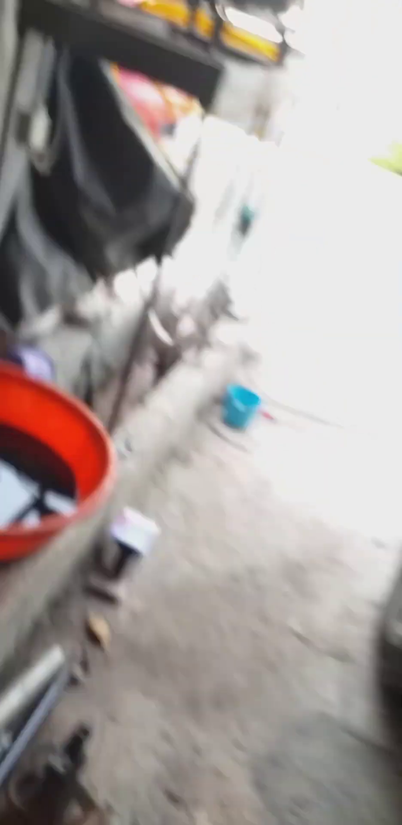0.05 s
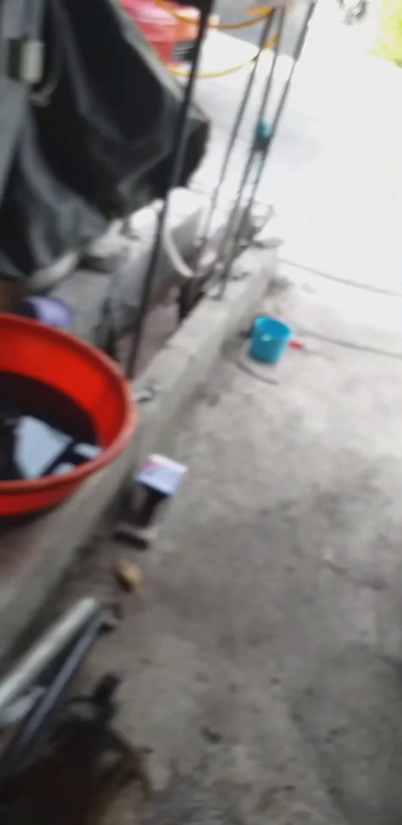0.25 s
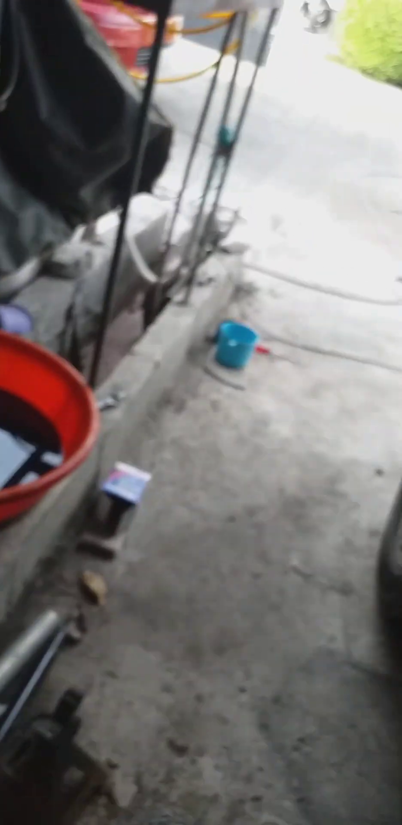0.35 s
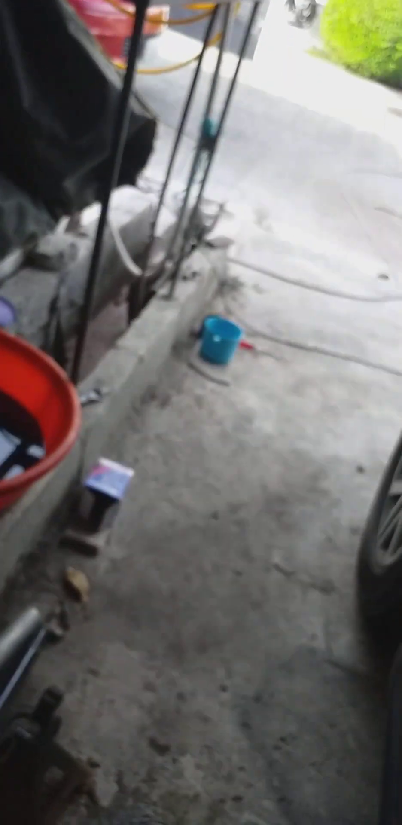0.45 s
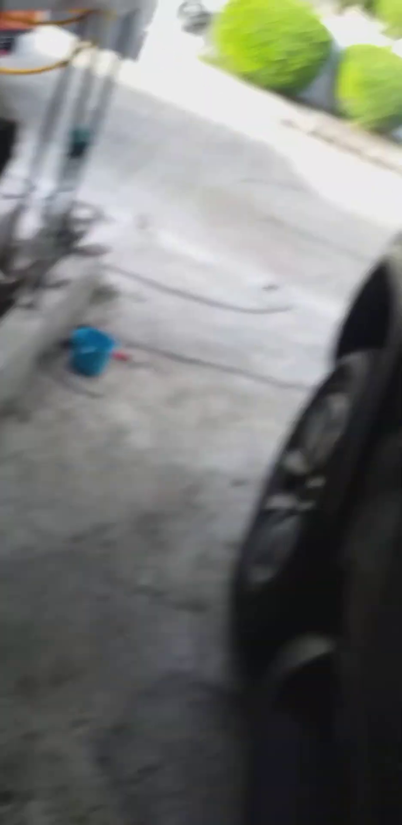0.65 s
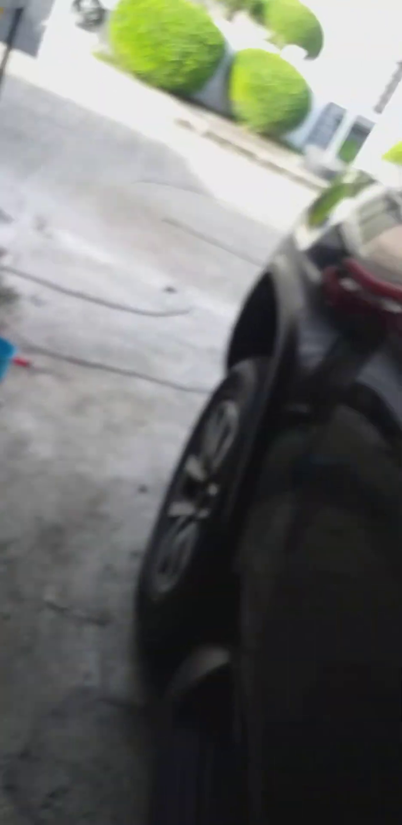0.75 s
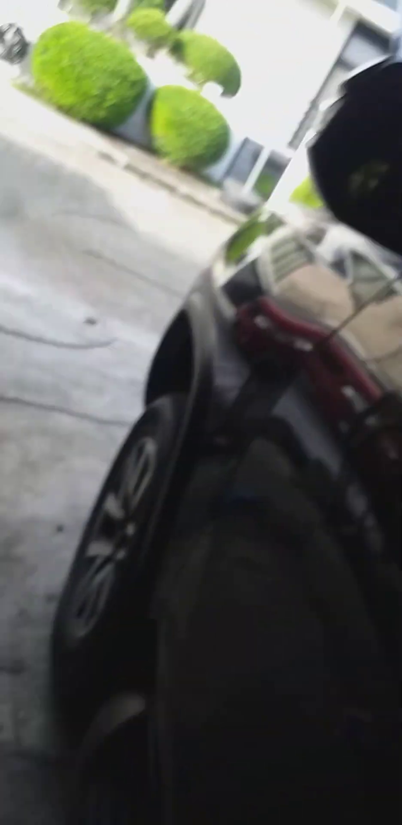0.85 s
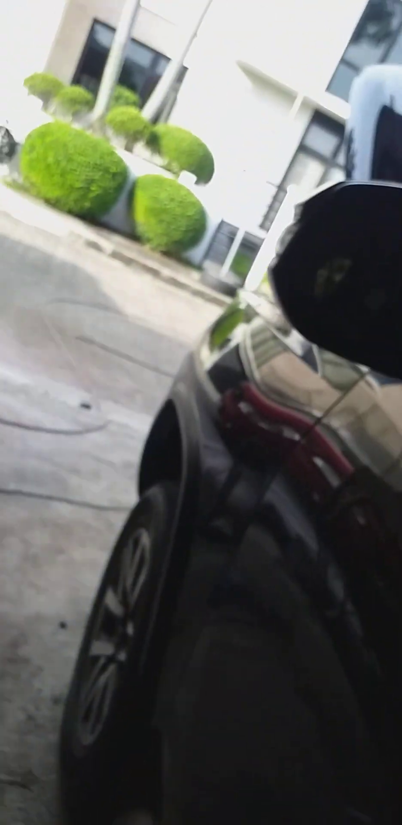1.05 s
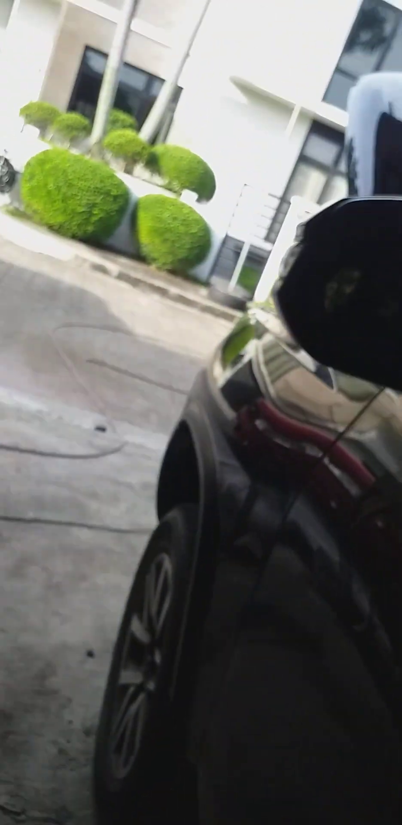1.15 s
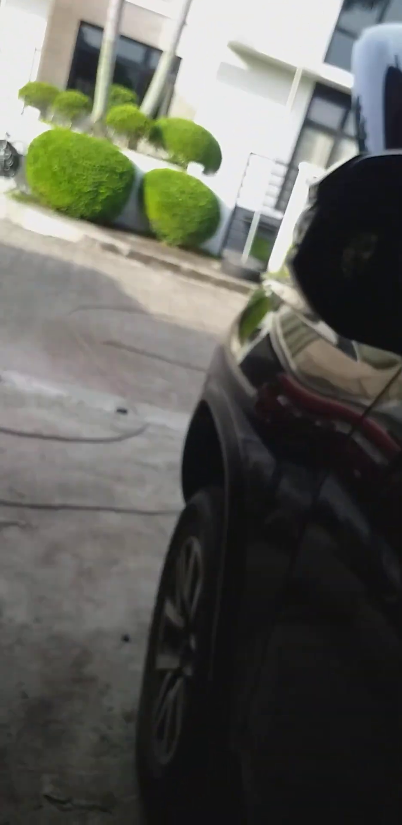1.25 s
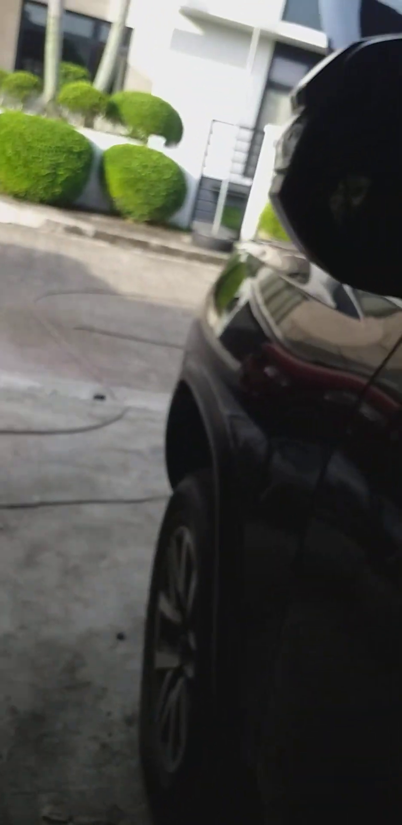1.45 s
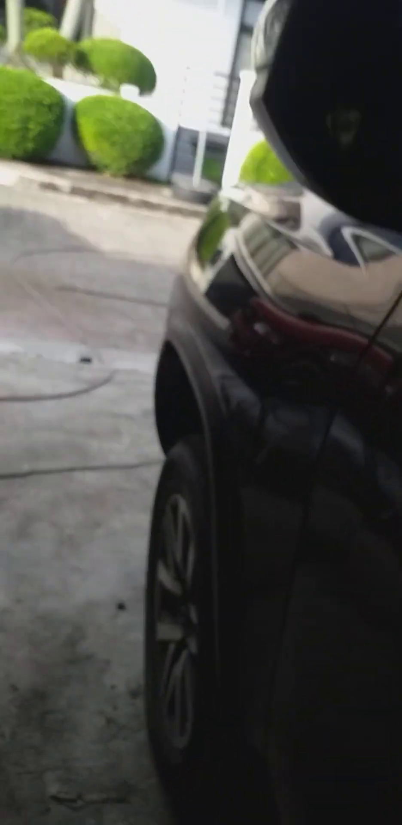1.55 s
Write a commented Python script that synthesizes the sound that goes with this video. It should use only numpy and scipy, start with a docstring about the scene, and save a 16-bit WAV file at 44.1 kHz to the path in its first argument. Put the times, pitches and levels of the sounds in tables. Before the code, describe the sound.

A car door is shut close by in a workshop yard, a hollow thud with a short rattle of latch and trim. A machine hisses and whines throughout as the microphone is carried alongside the car, bumping softly.

```python
"""A car door is shut close by in a workshop yard: the latch touches, the door thuds home, its panels shudder.
Each contact rings the hollow body and steel panels and rattles latch and trim; the yard answers weakly.
A machine runs throughout, a hissing drone with rough whines that drift, swell and fade as the microphone
is carried alongside the car. Under it lie a low hum and a few soft handling bumps."""
import sys
import numpy as np
from scipy import signal
from scipy.fft import rfft, irfft, next_fast_len
from scipy.io import wavfile
from scipy.ndimage import uniform_filter1d, map_coordinates

SR = 44100
rng = np.random.default_rng(int(sys.argv[2]) if len(sys.argv) > 2 else 0)


def generate_wav(sig):
    """Save sig (samples, or channels by samples) to the path in sys.argv[1] as 16-bit PCM at SR."""
    pcm = np.round(np.clip(np.atleast_2d(sig).T, -1, 1) * 32767).astype(np.int16)
    wavfile.write(sys.argv[1], SR, pcm)


N = 70560


def amp(db):
    """Decibels to gain."""
    return 10 ** (np.asarray(db) / 20)


def unit(x):
    """Scale to rms 1."""
    return x / np.sqrt(np.mean(x ** 2) + 1e-20)


def clock(start_s=0):
    """Seconds since start_s per sample, zero before it."""
    return np.maximum(np.arange(N) / SR - start_s, 0)


def curves(rows):
    """Per-sample curve for each column after the time."""
    time_s, *columns = np.transpose(rows)
    return [np.interp(clock(), time_s, column) for column in columns]


def wobble(rate_hz):
    """Smooth random curve, rate_hz knots a second."""
    knots = rng.standard_normal(int(N * rate_hz / SR) + 4)
    return map_coordinates(knots, [clock() * rate_hz])


def filtered(x, response):
    """Apply a frequency response, a function of Hz."""
    size = next_fast_len(N + SR // 2)
    return irfft(rfft(x, size) * response(np.fft.rfftfreq(size, 1 / SR)), size)[:N]


def noise(spectrum):
    """Noise of rms 1 shaped by (freq_hz, level_db) points."""
    freq_hz, level_db = np.transpose(spectrum)
    white = rng.standard_normal(N)
    return unit(filtered(white, lambda hz: amp(np.interp(np.log(hz + 1), np.log(freq_hz + 1), level_db))))


def narrow(centre_hz, width_hz):
    """Noise band of rms 1 around a steady or moving centre."""
    a, b = [filtered(rng.standard_normal(N), lambda hz: 1 / (1 + (hz / width_hz) ** 2 / 2) ** 2)
            for _ in range(2)]
    phase = 2 * np.pi * np.cumsum(centre_hz * np.ones(N)) / SR
    return unit(a * np.cos(phase) + b * np.sin(phase))


def fade(t, attack_s, t60_s):
    """Quick rise, exponential decay."""
    return (1 - np.exp(-t / attack_s)) * np.exp(-np.log(1000) * t / t60_s)


def patchy(x, depth_db):
    """Narrow bands swell and sink at random; output rms 1."""
    spectra = signal.stft(x, nperseg=1024)[2]
    field = uniform_filter1d(rng.standard_normal(spectra.shape), size=3, axis=0)
    field = uniform_filter1d(field, size=18, axis=1)
    return unit(signal.istft(spectra * amp(depth_db * unit(field)), nperseg=1024)[1][:N])


def machine_hum():
    """Low rumble with three unsteady tones."""
    spectrum = [(25, -35), (45, 7), (65, 0), (130, 6.5), (220, 2.5), (350, -2.5), (550, 1), (900, -17),
                (2000, -39)]  # rumble: freq_hz, relative_db
    envelope = [(0, -46.5), (.3, -41.5), (.65, -48.5), (.9, -56), (1.3, -56.5), (1.6, -52.5)]  # rumble: time_s, level_db
    tones = [(60, -69.5), (361, -62), (500, -68.5)]  # pitch_hz, level_db
    level_db, = curves(envelope)
    rumble = amp(level_db) * noise(spectrum)
    return rumble + sum(amp(db) * narrow(hz, width_hz=7.4) for hz, db in tones)


def machine_hiss():
    """Broad hiss with four rough, drifting resonances, one brief whistle and a steady sizzle."""
    spectrum = [(150, -33), (400, -12), (800, -10), (1200, -5), (1550, -6.5), (2100, -3.5), (2700, -4.5),
                (3400, -1.5), (4200, -5), (5000, -1), (5700, -4), (6400, -11.5), (7300, -19), (8100, -36),
                (9000, -43), (10500, -35), (13000, -36), (16000, -40)]  # hiss: freq_hz, relative_db
    envelope = [(0, -28), (.1, -29), (.22, -29), (.33, -31), (.45, -31.5), (.56, -34), (.7, -34), (.9, -36),
                (1.1, -36.5), (1.42, -35.5), (1.5, -33), (1.59, -31.5)]  # hiss: time_s, level_db
    # whine tracks: time_s, pitch_hz, level_db
    low = [(0, 990, -41), (0.108, 947, -38), (0.222, 1003, -49), (0.419, 1055, -38), (0.579, 1070, -48.5),
           (0.762, 1140, -48.5), (1.03, 1029, -53.5), (1.25, 1046, -53), (1.6, 973, -53)]
    mid = [(0, 1978, -38), (0.151, 1912, -41), (.4, 2115, -41), (0.599, 2168, -51), (0.719, 2206, -45.5),
           (.9, 2157, -42.5), (1.029, 2078, -37), (1.121, 2086, -48.5), (1.3, 2109, -42.5),
           (1.431, 2005, -53), (1.58, 1956, -40.5)]
    high = [(0, 3010, -32), (0.109, 2970, -37), (0.239, 2930, -43), (.33, 3260, -32.5), (0.401, 3260, -38),
            (0.501, 3290, -35.5), (0.572, 3280, -46), (.74, 3440, -43), (0.879, 3400, -45.5),
            (1.129, 3345, -44), (1.24, 3325, -38), (1.32, 3320, -49), (1.389, 3060, -45.5),
            (1.501, 2990, -42.5), (1.6, 3100, -47)]
    shrill = [(0, 5446, -41), (0.169, 5330, -37.5), (.3, 4980, -56), (.52, 5095, -46.5), (.7, 4956, -38.5),
              (0.782, 5186, -43.5), (0.879, 5072, -36.5), (.94, 5130, -43), (1.001, 5040, -39),
              (1.129, 5150, -39), (1.2, 5092, -42.5), (1.289, 5310, -42.5), (1.37, 5000, -39.5),
              (1.47, 4907, -51), (1.58, 5170, -34)]
    widths_hz = [25, 21.5, 42.4, 69]  # whine cores, low to shrill: width_hz
    level_db, = curves(envelope)
    out = amp(level_db) * patchy(noise(spectrum), depth_db=2)
    for track, width_hz in zip([low, mid, high, shrill], widths_hz):
        pitch_hz, whine_db = curves(track)
        core = narrow(pitch_hz, width_hz)
        skirt = amp(-10.5) * narrow(pitch_hz, width_hz=140)
        out += amp(whine_db) * unit(core + skirt)
    swell = np.exp(-((clock() - 0.892) / 0.13) ** 2)
    whistle = amp(-37) * swell * narrow(4715, width_hz=39)
    sizzle = amp(-44.5) * narrow(4790, width_hz=350)
    flutter_db = 0.15 * wobble(rate_hz=250)
    return (out + whistle + sizzle) * amp(flutter_db)


def handling():
    """Soft, dull bumps on the carried microphone."""
    bumps = [(.025, 105, -35), (0.099, 85, -32.5), (.43, 68, -36), (0.474, 110, -35), (.58, 150, -46.5)]  # start_s, pitch_hz, level_db
    rise_s = 0.0071
    out = np.zeros(N)
    for start_s, pitch_hz, level_db in bumps:
        age = clock(start_s) / rise_s
        out += amp(level_db) * age * np.exp(1 - age) * narrow(pitch_hz, width_hz=26)
    return out


def yard(x):
    """Weak, diffuse reflections from walls and roof."""
    tail = rng.standard_normal(N) * fade(clock(), attack_s=0.018, t60_s=0.53)
    return amp(-24) * signal.fftconvolve(x, tail / np.linalg.norm(tail))[:N]


def latch():
    """The steel catch rings briefly as it snaps in."""
    envelope = fade(clock(start_s=0.279), attack_s=0.0016, t60_s=0.048)
    return amp(-14) * narrow(4430, width_hz=280) * envelope


def ring(modes, t, attack_s):
    """Decaying modes of a struck part, normalised; levels and phases vary per blow."""
    modes_rms = np.linalg.norm([amp(db) for _, db, _ in modes]) / np.sqrt(2)
    out = np.zeros(N)
    for k, (pitch_hz, level_db, t60_s) in enumerate(modes):
        gain = (-1) ** k * amp(level_db + rng.normal())
        phase = 2 * np.pi * pitch_hz * t + 0.68 * rng.normal()
        out += gain * fade(t, attack_s, t60_s) * np.sin(phase)
    return out / modes_rms


def door():
    """Each contact booms in the hollow body, rings the steel panels and rattles latch and trim."""
    contacts = [(.235, -50, -12.5, -34.5), (0.2601, -10.5, -13.5, -12), (.269, -15.5, -20.5, -18),
                (.281, -17, -19.5, -21.5), (.292, -9, -12, -29.5), (.338, -14.5, -23.5, -52),
                (.372, -23.5, -38, -58), (0.41, -36, -33.5, -41)]  # start_s, boom_db, panel_db, clatter_db
    body_modes = [(51, -12.5, 0.39), (76, -6, 0.39), (94, -9.5, .14), (126.4, -6.5, 0.23),
                  (156.4, -3.5, 0.28), (204.7, 1.5, 0.166), (269.8, -2, 0.151)]  # pitch_hz, relative_db, t60_s
    panel_modes = [(321.5, -4.5, 0.15), (371, -2.5, 0.12), (392.8, -3.5, 0.28), (459, 4, 0.14),
                   (481, -9.5, 0.15), (522.5, 0.5, 0.14), (586, -13.5, 0.23), (870, -9, 0.099),
                   (981, -16, 0.13), (1128, -7, 0.13)]  # pitch_hz, relative_db, t60_s
    shell_spectrum = [(30, -19), (120, -11), (300, 1), (480, 1), (700, -4), (1000, -6), (1400, -18.5),
                      (2500, -12.5), (6000, -32), (9000, -82)]  # dense shell ringing: freq_hz, relative_db
    clatter_spectrum = [(200, -34), (900, 6), (1300, -2.5), (1600, -1), (2100, 3), (2700, -6), (3600, -1),
                        (4500, 1.5), (5300, -11.5), (7000, -22), (8800, -52), (11000, -32.5), (16000, -36)]  # latch and trim: freq_hz, relative_db
    panel_attack_s = 0.00058
    out = np.zeros(N)
    for start_s, boom_db, panel_db, clatter_db in contacts:
        t = clock(start_s)
        shell = amp(-3.5) * noise(shell_spectrum) * fade(t, panel_attack_s, t60_s=0.28)
        clatter = unit(noise(clatter_spectrum) * amp(1.03 * wobble(rate_hz=600)))
        crack = amp(-0.5) * fade(t, attack_s=0.0001, t60_s=0.018)
        decay = fade(t, attack_s=0.0014, t60_s=0.25)
        out += amp(boom_db) * ring(body_modes, t, attack_s=0.0018)
        out += amp(panel_db) * (ring(panel_modes, t, panel_attack_s) + shell)
        out += amp(clatter_db) * clatter * (crack + decay)
    return out


def scene():
    """The door in its yard over the running machine; mono."""
    thud = door() + latch()
    return (thud + yard(thud) + machine_hiss() + machine_hum() + handling())[None]


def record(dry):
    """Microphone: bass roll-off, soft clip at full scale, band limit."""
    low_cut_hz, top_hz = 30, 15750
    x = filtered(dry[0], lambda hz: (1j * hz / (low_cut_hz + 1j * hz)) ** 2)
    x = x / (1 + x ** 8) ** (1 / 8)
    return filtered(x, lambda hz: hz < top_hz)[None]


dry = scene()
out = record(dry)
generate_wav(out)
```